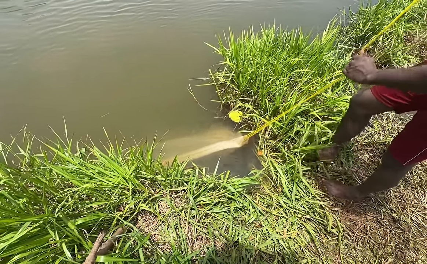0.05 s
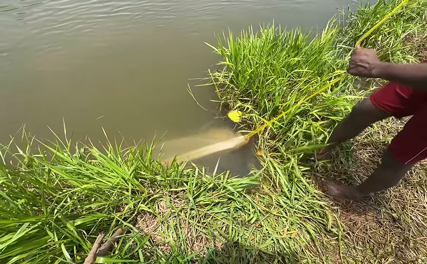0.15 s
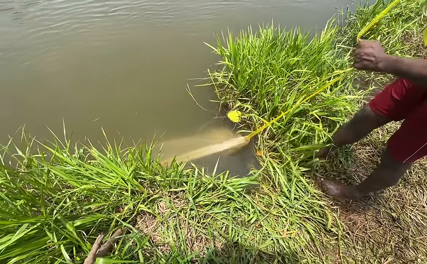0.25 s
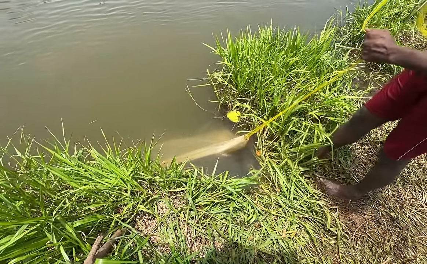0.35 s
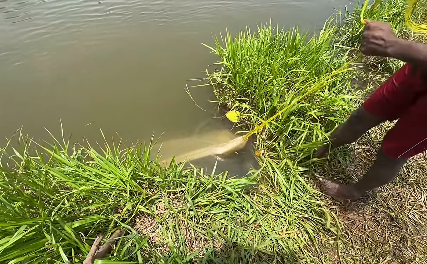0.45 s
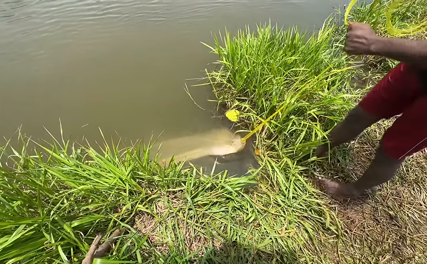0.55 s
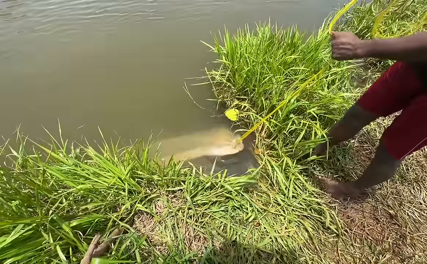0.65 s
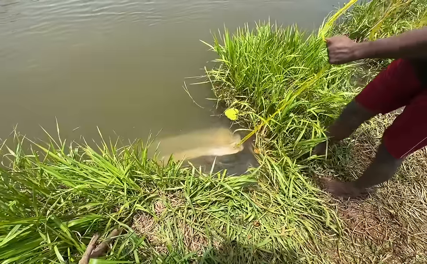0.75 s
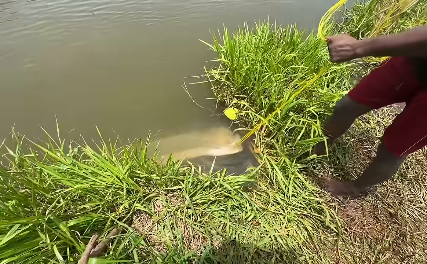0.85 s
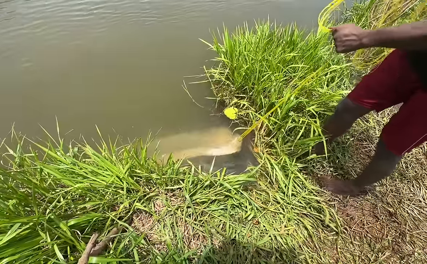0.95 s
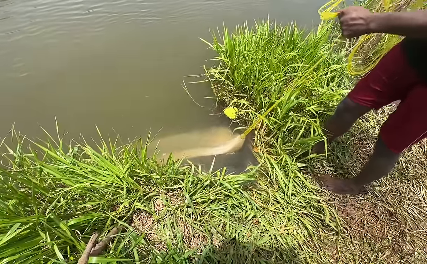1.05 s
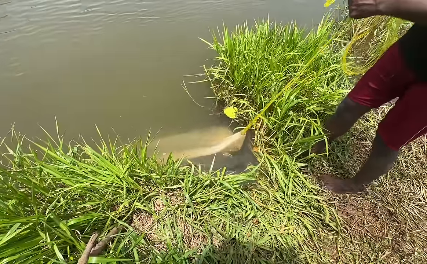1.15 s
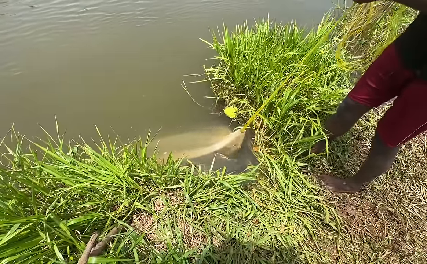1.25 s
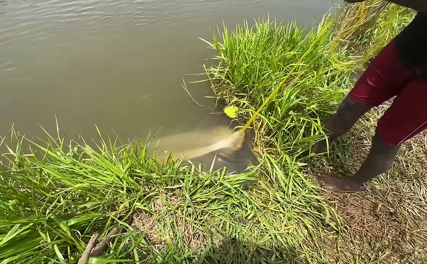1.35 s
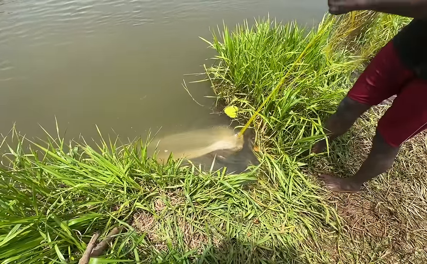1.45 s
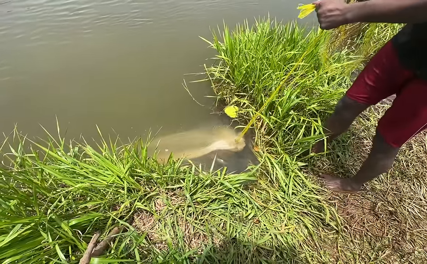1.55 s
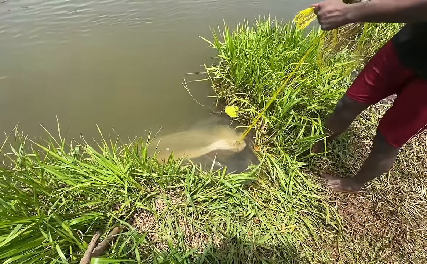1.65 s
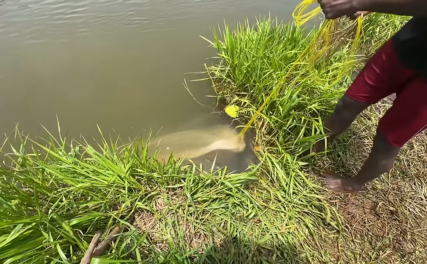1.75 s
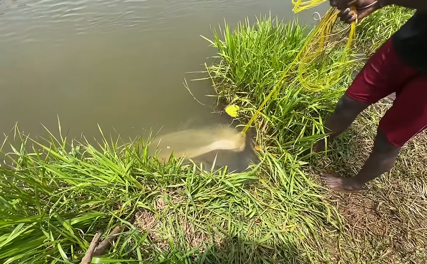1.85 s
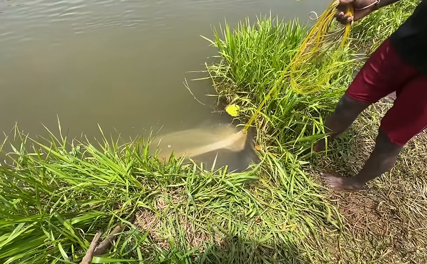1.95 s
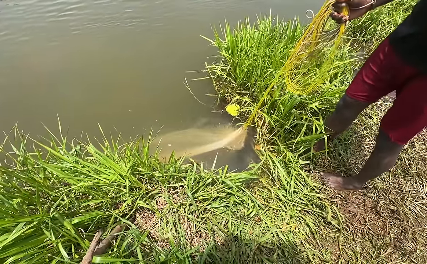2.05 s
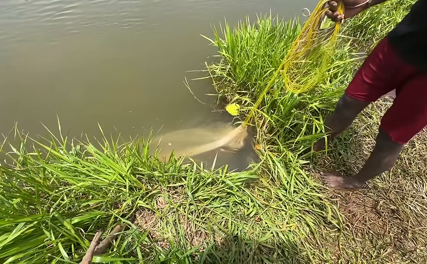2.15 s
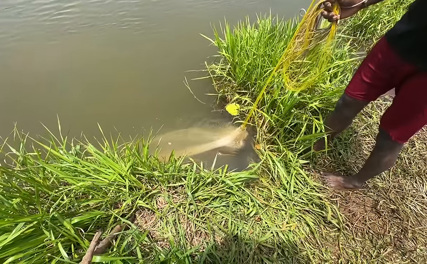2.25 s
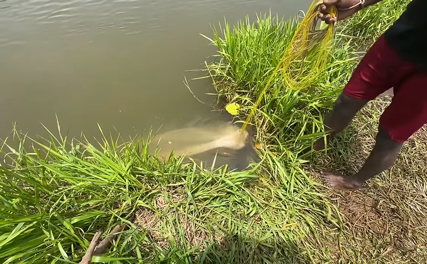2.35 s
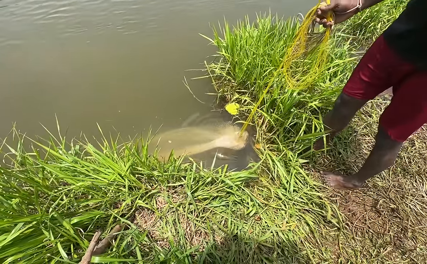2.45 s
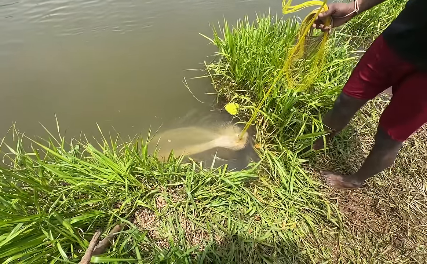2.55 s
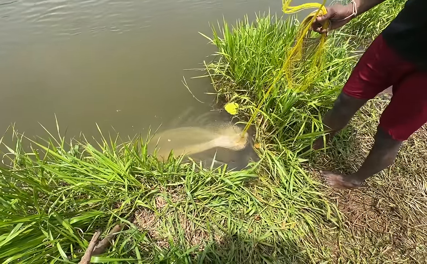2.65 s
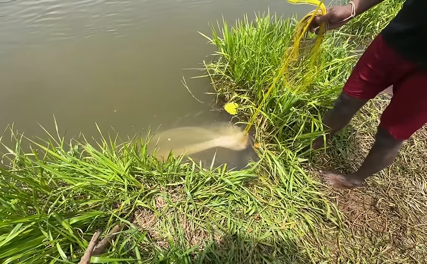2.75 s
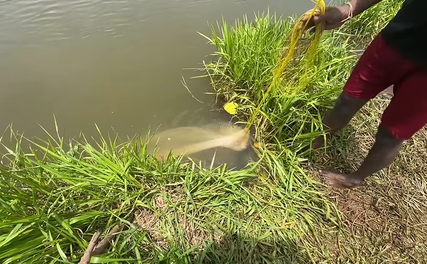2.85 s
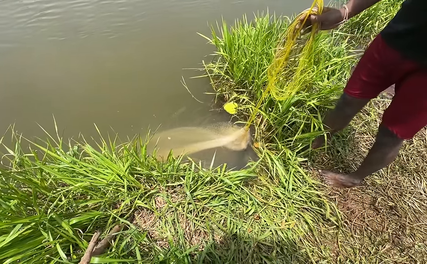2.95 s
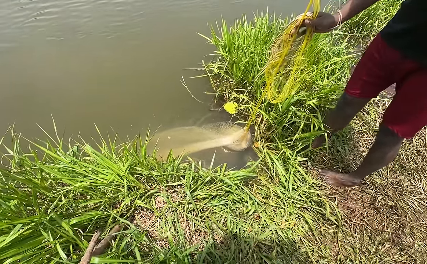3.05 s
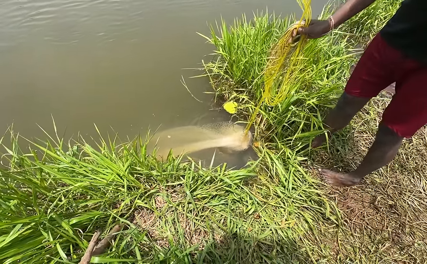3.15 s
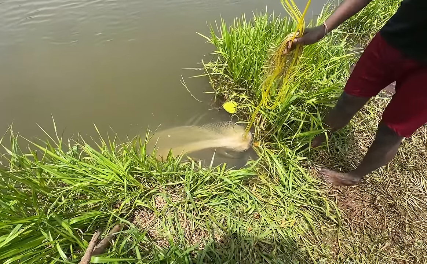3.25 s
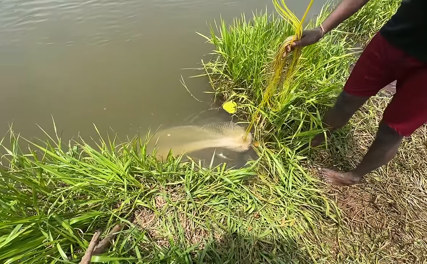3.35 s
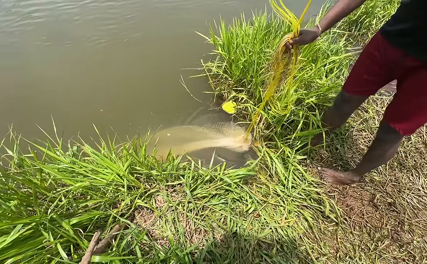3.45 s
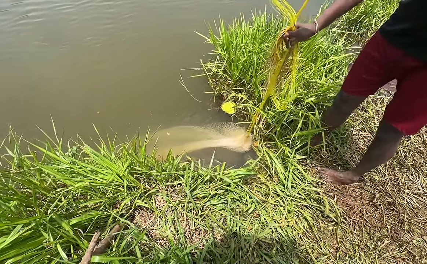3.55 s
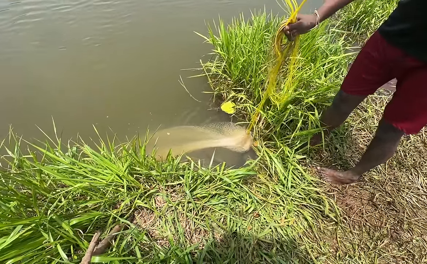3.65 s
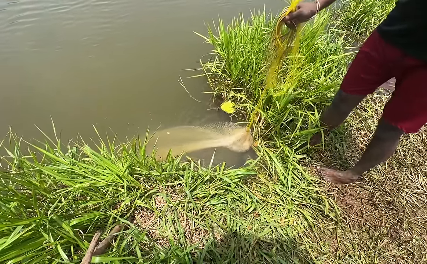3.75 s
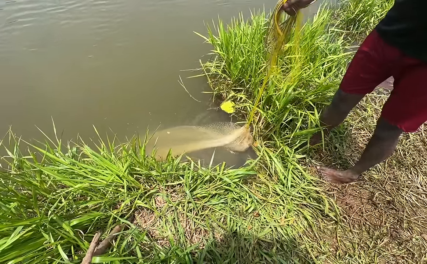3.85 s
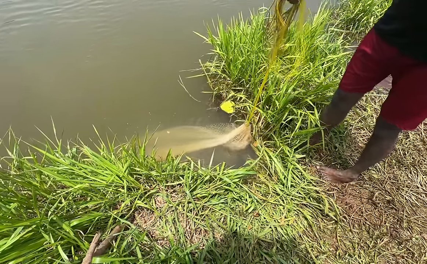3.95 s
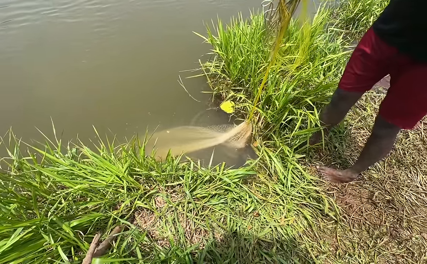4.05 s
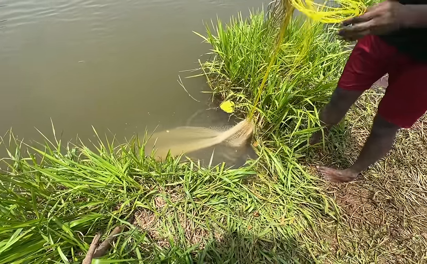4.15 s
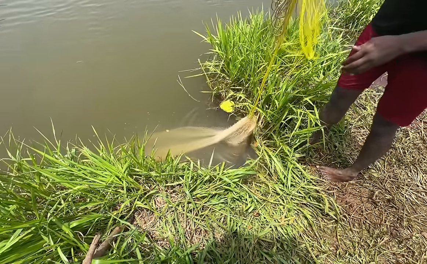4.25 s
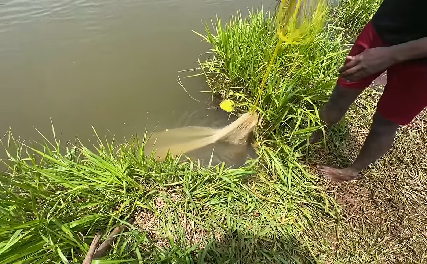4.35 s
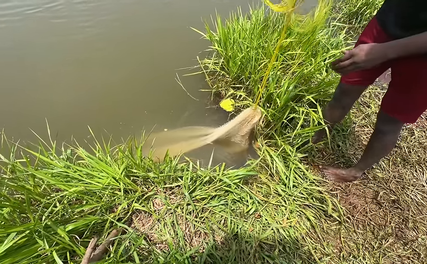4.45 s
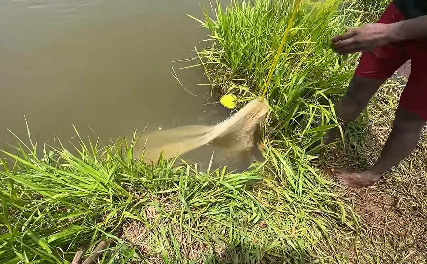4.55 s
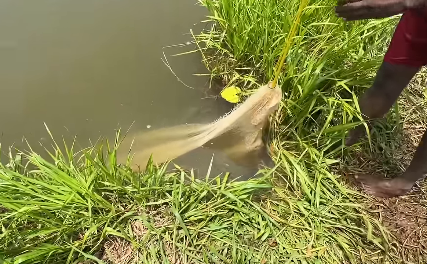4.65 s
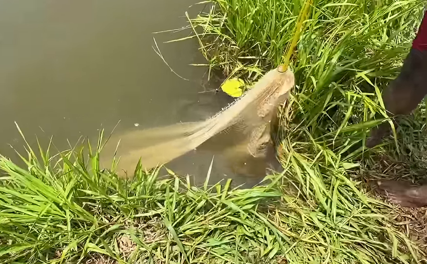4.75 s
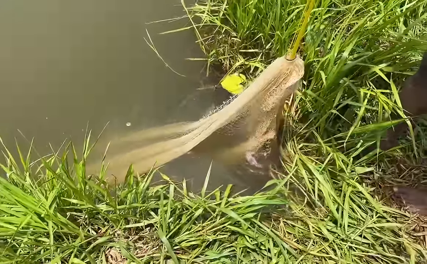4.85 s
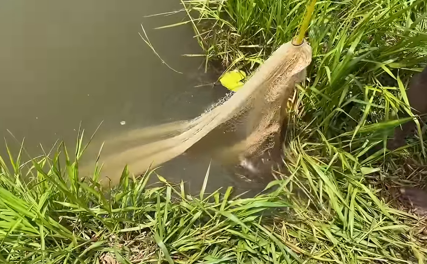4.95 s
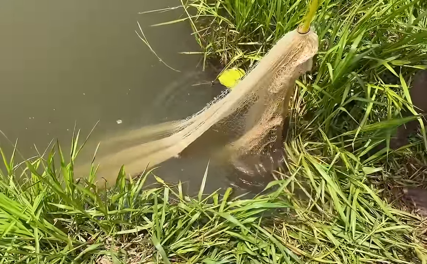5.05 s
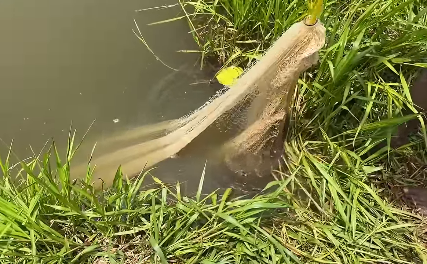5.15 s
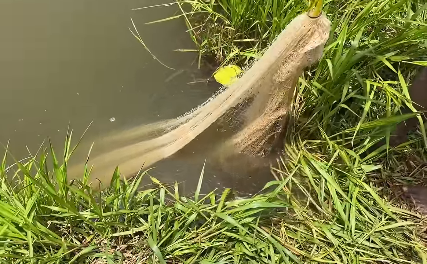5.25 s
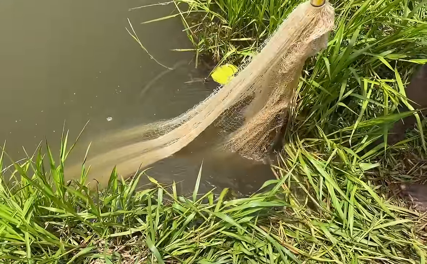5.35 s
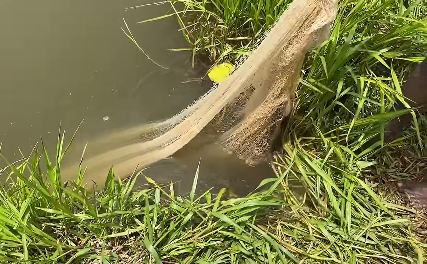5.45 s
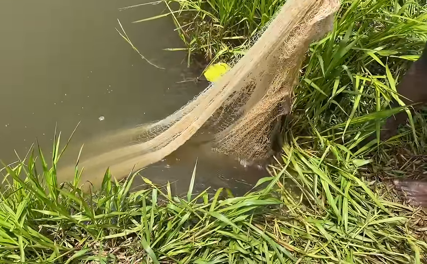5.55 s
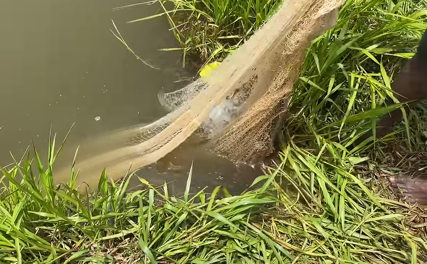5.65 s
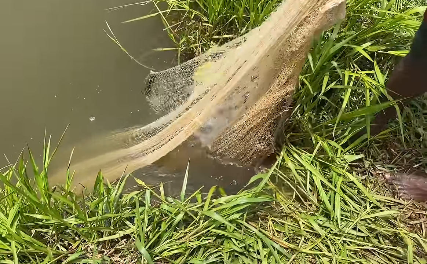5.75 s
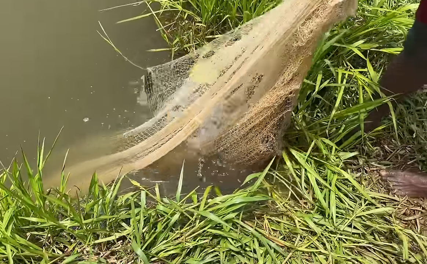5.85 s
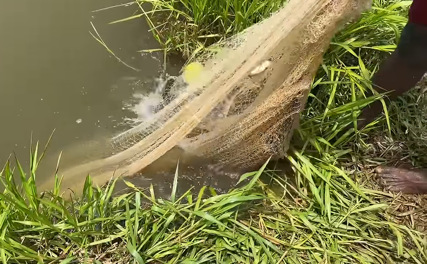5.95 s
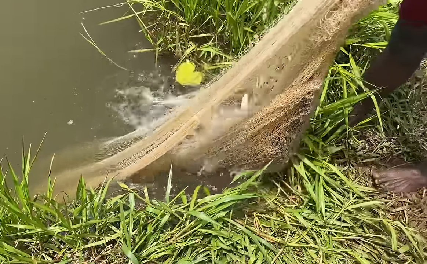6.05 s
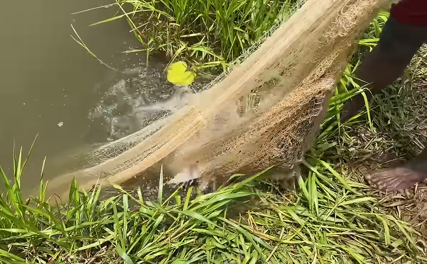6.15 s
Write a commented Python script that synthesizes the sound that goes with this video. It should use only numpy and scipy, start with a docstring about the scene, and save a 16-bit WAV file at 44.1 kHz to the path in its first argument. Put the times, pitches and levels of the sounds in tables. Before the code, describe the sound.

On an open river bank, grass crackles and stems snap as a net is dragged, with a few hollow plops at the waterline. The hauling eases, leaving chirping birds, shrill pulsing insects and low wind bumps on the microphone. At the very end the net surfaces close by with a sudden splash, slaps, bubbling and spray swelling until the cut.

```python
"""A cast net is dragged through the grass of a river bank: noise crackles, stems snap, plops ring at the waterline.
Two insects chirp in wing strokes, wind presses and flutters on the microphone, and birds call in gliding tones.
The haul rests while the rope is coiled, with a few tugs and swishes left among the birds, then picks up again.
At 5.6 s the net breaks the surface and the catch thrashes: slaps of ringing cavities, rushing water and spray,
with drops and a swarm of bubbles."""
import sys
import numpy as np
from scipy import signal
from scipy.fft import rfft, irfft, next_fast_len
from scipy.io import wavfile
from scipy.ndimage import uniform_filter1d

SR = 44100
rng = np.random.default_rng(int(sys.argv[2]) if len(sys.argv) > 2 else 0)


def pcm_store(signal):
    """Save signal as 16-bit PCM."""
    levels = np.round(np.clip(np.atleast_2d(signal), -1, 1) * 32767)
    wavfile.write(sys.argv[1], SR, levels.astype(np.int16).T)


N = 273727
TIME = np.arange(N) / SR
SURFACING_S = 5.6
CUTOFF_HZ = 16000
BIRD_LAG_S = 0.00044   # the left side hears the birds first

# tone of churned water: [pitch_hz, level_db per Hz]
WATER = [(45, -10), (80, 4.5), (140, 2.5), (230, -2.5), (330, -7.5), (520, 0.5), (760, -4.5), (1050, -1.5),
         (1450, 1), (2000, -1.5), (2450, -7), (2900, -25), (3500, -8)]
# left-right likeness of sound in the open: [pitch_hz, likeness -1 to 1]
AIR_LIKENESS = [(60, 0.13), (300, 0.34), (700, -0.04), (1400, -0.26), (4000, -0.1), (15000, 0.061)]


def from_db(db):
    """Decibels to a linear gain."""
    return 10 ** (np.asarray(db) / 20)


def rms_one(x):
    """Scale a sound to rms 1."""
    return x / np.sqrt(np.mean(x ** 2) + 1e-20)


def in_time(rows):
    """The columns of a curve, one value a sample."""
    s, *columns = np.transpose(rows)
    return [np.interp(TIME, s, column) for column in columns]


def at_hz(points, hz):
    """Read a curve at a pitch, straight between points on a log pitch axis."""
    points = np.array(points)
    return np.interp(np.log(hz), np.log(points[:, 0]), points[:, 1])


def add(out, s, sound, pan_db=0, lag=0):
    """Mix a sound in at time s, leaning left by pan_db and reaching the right side lag seconds later."""
    for side, sign in zip(out, (1, -1)):
        i = int(np.clip((s - sign * lag / 2) * SR, 0, N))
        side[i:i + len(sound)] += from_db(sign * pan_db / 2) * sound[:N - i]


def drift(rate):
    """Random wandering of rms 1, smoothed above rate Hz and held for 40 samples a step."""
    r = np.exp(-80 * np.pi * rate / SR)
    chance = rng.standard_normal(N // 40 + 2002)
    slow = signal.lfilter([1], [1, -2 * r, r * r], chance)[2000:]   # skip the filter's settling
    return np.repeat(rms_one(slow), 40)[:N]


def noise(spectrum, likeness, patchy_db, rate):
    """Stereo noise in third-octave bands, each flickering on its own; rms 1."""
    out, edges = 0, 20 * 2 ** (np.arange(30) / 3)
    white = rng.standard_normal((2, 2, N))
    for k, (low, high) in enumerate(zip(edges, edges[1:])):
        if high < spectrum[0][0] or low > spectrum[-1][0]:
            continue
        hz = np.sqrt(low * high)
        band = signal.butter(2, [low, high], "band", fs=SR, output="sos")
        mid, side = signal.sosfilt(band, white[k % 2])   # neighbouring bands use separate noise
        alike = np.clip(at_hz(likeness, hz), -1, 1)
        gain = from_db(at_hz(spectrum, hz) + patchy_db * drift(rate))
        out = out + gain * (np.sqrt(1 + alike) * mid + np.sqrt(1 - alike) * side * [[1], [-1]])
    return rms_one(out)


def burst(t60, attack):
    """A quick straight rise to height 1, then a decay of 60 dB in t60 seconds."""
    t = np.arange(int((t60 + attack) * SR) + 2) / SR
    return np.minimum(t / attack, 1) * from_db(-60 * np.maximum(t - attack, 0) / t60)


def swell(length, rise):
    """A smooth hump of height 1 that peaks after the share rise of its length."""
    along = np.linspace(0, 1, int(length * SR))
    return np.sin(np.pi * np.interp(along, [0, np.clip(rise, .05, .95), 1], [0, .5, 1]))


def hiss(shape, hz, width):
    """Noise around hz under an envelope; width is the ratio of its top to its centre."""
    width = max(width, 1.05)
    band = signal.butter(2, [hz / width, min(hz * width, CUTOFF_HZ)], "band", fs=SR, output="sos")
    return shape * rms_one(signal.sosfilt(band, rng.standard_normal(len(shape))))


def bubble(hz, t60, attack, rise):
    """A pocket of air rings, rising in pitch by the share rise as it nears the surface."""
    shape = burst(t60, attack)
    pitch = hz * (1 + rise * np.linspace(0, 1, len(shape)))
    return shape * np.sin(2 * np.pi * np.cumsum(pitch) / SR)


def open_air():
    """The steady air of the bank: faint noise whose bands flicker."""
    # tone of the air: [pitch_hz, level_db per Hz]
    air_tone = [(59, -22), (100, 5.5), (396, -5.5), (1000, -8), (2110, -7), (2540, -66), (2790, -7),
                (3120, -38), (4780, -51), (6800, -111.5), (8500, 0), (11000, -49.5), (18700, -120)]
    return from_db(-65.5) * noise(air_tone, AIR_LIKENESS, patchy_db=5.0, rate=12.2)


def wind():
    """The breeze makes lumpy pressure on each port; a buffet is a low push of a few cycles with a flutter above it."""
    # tone of the low pressure noise: [pitch_hz, level_db per Hz]
    rumble_tone = [(20, -29), (32, -9.5), (50, -4), (75, -0.5), (100, -10), (135, -15), (200, -25.5),
                   (300, -96)]
    # tone of the flutter: [pitch_hz, level_db per Hz]
    flutter_tone = [(90, -7.5), (170, 7), (270, -10.5), (400, -43), (560, -28)]
    # breeze on the microphone, before the trims of rumble and flutter: [time_s, level_db]
    breeze = [(0.0, -64.5), (0.62, -61), (0.78, -57), (1.62, -49), (1.86, -60), (3.28, -62.5),
              (3.66, -45.5), (3.76, -62.5), (4.21, -57.5), (4.4, -67.5), (4.78, -69.5), (5.08, -51),
              (5.42, -71), (5.61, -59.5), (5.78, -53), (6.2, -85)]
    # buffets of wind: [centre_s, push_db, push_hz, flutter_db, flutter_length_s]
    buffets = [(0.104, -48.5, 142, -51, 0.046), (0.789, -42, 82, -61, 0.12),
               (1.072, -32.5, 76.5, -57, 0.074), (1.321, -35, 75, -55.5, 0.22),
               (2.139, -44.5, 59.3, -82, .06), (2.289, -45.5, 76, -68, 0.054),
               (3.556, -33.5, 77, -41.5, 0.037), (3.614, -34.5, 107, -52, 0.065),
               (3.71, -29.5, 71.5, -53.5, 0.12), (3.783, -38, 72, -55.5, 0.061),
               (3.974, -48, 87.5, -55, 0.12), (4.106, -37, 84, -48.5, 0.28), (4.247, -43, 78, -48.5, 0.093),
               (5.103, -43.5, 96, -53, 0.036), (5.355, -36.5, 67.6, -60, 0.19),
               (5.668, -35.5, 84, -43.5, 0.11), (5.862, -37, 64.5, -62, 0.048)]
    breeze_db, = in_time(breeze)
    pushes, flutter = np.zeros((2, 2, N))
    for s, push_db, hz, flutter_db, length in buffets:
        t = np.arange(0, 4.28 / hz, 1 / SR)   # 4.28 cycles
        push = np.hanning(len(t)) * np.sin(2 * np.pi * (hz * t + rng.random()))
        add(pushes, s - t[-1] / 2, from_db(push_db) * push, pan_db=6.5)
        add(flutter, s - length / 2, from_db(flutter_db) * swell(length, 0.31) ** 2, pan_db=9.5)
    rumble = from_db(breeze_db + 7) * noise(rumble_tone, AIR_LIKENESS, patchy_db=5.0, rate=7.3)
    flutter = np.hypot(flutter, from_db(breeze_db - 22.5))
    return rumble + pushes + flutter * noise(flutter_tone, AIR_LIKENESS, patchy_db=7.0, rate=20.0)


def far_chorus(chorus_db):
    """Far birds along the river blur into a flickering band of noise."""
    # tone of the far birds: [pitch_hz, level_db per Hz]
    chorus_tone = [(1200, -28), (2000, 15.5), (2500, -1), (3200, 9.5), (4100, 4.5), (5400, 12), (6500, -24)]
    return from_db(chorus_db - 0.8) * noise(chorus_tone, AIR_LIKENESS, patchy_db=2.5, rate=5.4)


def note(length, pitches, trill, waver, sweep=0.058, dip=0.78, hoarse=0.031, rise=0.45, soft=0.3):
    """A whistle arching through three pitches; in a trill it turns hoarse and breaks into quick downward flicks."""
    t = np.arange(int(length * SR)) / SR
    along, flick = t / length, t * 50.15 % 1   # flicks per s
    unsteady = waver[rng.integers(N - len(t)):][:len(t)]
    hz = np.polyval(np.polyfit([0, .5, 1], pitches, 2), along)
    hz = hz * (1 + sweep * trill * (1 - 2 * flick) + (0.006 + hoarse * trill) * unsteady)
    gaps = 1 - np.clip(dip * trill, 0, 1) * np.cos(np.pi * flick) ** 2
    shape = np.abs(swell(length, rise)) ** soft * gaps
    return rms_one(shape * np.sin(2 * np.pi * np.cumsum(hz) / SR))


def twitter(chorus_db, count):
    """Far birds chirp at random, their level following the chorus."""
    out, waver = np.zeros((2, N)), drift(200)
    for when, pitch, glide, span, loud, side in rng.random((count, 6)):
        pitches = 2050 * 2.1 ** pitch * (1 + 0.145 * (glide - .4) * np.array([1, 0, -1]))
        level_db = chorus_db[int(when * N)] - 1 + 7 * loud
        chirp = note(0.015 + 0.0449 * span, pitches, trill=0.43, waver=waver)
        add(out, when * N / SR, from_db(level_db) * chirp, pan_db=8 * (side - .5))
    return out


def coos():
    """A far bird's call rises and sinks; only its second to fourth harmonics carry across the water."""
    # calls, with the pitch that the arch scales: [start_s, length_s, pitch_hz, level_db]
    coo_calls = [(1.402, 0.44, 584, -62), (2.22, 0.45, 624, -58), (2.905, .39, 613, -59.5)]
    # pitch arch of a call: [share of the call, share of its pitch]
    coo_arch = [(0, 0.71), (.12, .96), (.28, 1.01), (.55, 0.97), (.78, .885), (1, 0.69)]
    # resonance of the throat: [pitch_hz, level_db]
    throat = [(900, -32), (1100, -3.5), (1250, 2.5), (1520, -5), (1680, -11), (1820, -6.5), (2500, -49)]
    out, waver = np.zeros((2, N)), drift(170)
    for s, length, pitch_hz, level_db in coo_calls:
        along = np.linspace(0, 1, int(length * SR))
        unsteady = 1 + 0.032 * waver[int(s * SR):][:len(along)]
        hz = pitch_hz * np.interp(along, *np.transpose(coo_arch)) * unsteady
        phase = 2 * np.pi * np.cumsum(hz) / SR
        call = sum(from_db(at_hz(throat, k * hz)) * np.sin(k * phase) for k in range(2, 5))
        call = rms_one(np.abs(np.sin(np.pi * along)) ** 0.32 * call)
        add(out, s, from_db(level_db) * call, pan_db=1.0, lag=0.00028)
    return out


def songbirds():
    """Small birds in the trees glide from pitch to pitch; one wheezes above them."""
    # gliding chirps: [start_s, length_s, first_hz, last_hz, level_db, trill 0-1, left_over_right_db]
    chirps = [(0.36, 0.13, 3450, 3300, -64, 0.6, -8), (0.351, 0.1, 1960, 2320, -66, 1, -4),
              (0.425, 0.047, 2340, 2316, -60, 0.8, -2), (0.464, 0.096, 3024, 2440, -60.5, 0.9, -2),
              (0.563, 0.023, 3350, 3454, -58.5, 0.2, -11.5), (0.598, 0.013, 2340, 1870, -55.5, 0.7, -3),
              (1.155, 0.12, 3950, 4020, -64, 0.13, -1), (1.162, 0.13, 3240, 3300, -61.5, 1, -5),
              (1.336, 0.043, 3040, 2540, -64, 1, -6), (1.44, 0.065, 3830, 4040, -61.5, 0.75, -3),
              (1.405, 0.035, 3220, 3285, -53.5, 0.46, -5.5), (1.761, 0.17, 3094, 3430, -66.5, 0.82, -6),
              (2.186, 0.031, 2960, 2980, -66, 0, -7.5), (2.225, 0.11, 4030, 4050, -63, 0.1, -1),
              (2.36, 0.019, 2660, 3440, -59, 0, -6), (2.46, 0.033, 3410, 2790, -59.5, 1, -4),
              (2.815, 0.065, 4100, 3890, -61, 0.4, 0), (2.835, 0.023, 3060, 3100, -62.5, 0.4, -14),
              (2.881, 0.048, 3620, 3450, -62, 0.04, -12), (3.049, 0.015, 2220, 1640, -65, 0.2, -8),
              (3.075, 0.022, 3170, 3120, -58, 0.82, -7), (3.194, 0.045, 3950, 3750, -66, 0.4, -4),
              (3.376, 0.051, 3330, 3840, -56, 0.47, -5.5), (3.384, 0.16, 3025, 3130, -60, 0.54, -8.5),
              (3.476, 0.053, 4350, 3980, -59.5, 0.13, -3), (3.642, 0.01, 3220, 3560, -62, 0.4, -16),
              (3.682, 0.026, 4170, 4250, -62.5, 0.03, -4), (3.693, 0.025, 4020, 3250, -59, 0.15, -6),
              (3.773, 0.033, 4310, 3940, -58, 0.72, 0), (3.797, 0.034, 3600, 3640, -56.5, 0.95, -8),
              (3.849, 0.04, 3450, 3130, -50, 0.5, -8), (3.862, 0.015, 4200, 3840, -57, 0.1, -2),
              (3.88, 0.033, 3380, 2865, -54.5, 0.13, 2), (3.916, 0.047, 2810, 2570, -56, 0.25, -4),
              (3.984, 0.014, 2640, 2480, -58.5, 0.35, -6), (3.94, 0.026, 3320, 3450, -62, 0.2, -5),
              (4.012, 0.016, 3740, 3090, -58.5, 0.5, -10), (4.093, 0.021, 4200, 4320, -55.5, 0.02, 0),
              (4.114, 0.019, 4200, 4010, -50.5, 0.34, -2), (4.14, 0.019, 3620, 4000, -55.5, 0.3, 1),
              (4.299, 0.04, 4110, 3980, -51.5, 0.28, 1), (4.325, 0.08, 3750, 3920, -52, 0.2, 0),
              (4.395, 0.033, 3900, 4065, -54.5, 0.16, 4), (4.535, 0.03, 3400, 3060, -61, 0.3, -1),
              (5.04, 0.044, 3940, 3670, -59.5, 0.2, -6), (5.314, 0.041, 2780, 2430, -65, 0.2, -5)]
    # thin hoarse calls, with the pitch that the arch scales: [start_s, length_s, pitch_hz, level_db]
    wheezes = [(1.441, 0.064, 4900, -66), (1.703, 0.22, 4940, -70.5), (1.834, 0.085, 5030, -72),
               (2.095, 0.18, 4830, -72.5), (2.453, 0.44, 4960, -68), (2.664, 0.19, 4800, -65)]
    # share of a wheeze's pitch at its start, middle and end
    wheeze_arch = np.array([0.98, 0.96, .93])
    out, waver = np.zeros((2, N)), drift(146.3)
    for s, length, first_hz, last_hz, level_db, trill, pan_db in chirps:
        call = note(length, np.geomspace(first_hz, last_hz, num=3), trill, waver)
        add(out, s, from_db(level_db) * call, pan_db, BIRD_LAG_S)
    for s, length, hz, level_db in wheezes:
        call = note(length, hz * wheeze_arch, 1, waver, sweep=0.019, dip=0.52, hoarse=0.0292)
        add(out, s, from_db(level_db) * call, pan_db=4.5, lag=BIRD_LAG_S)
    return out


def trills():
    """The nearest bird repeats one arching, rolled call."""
    # calls, with the pitch that the arch scales:
    # [start_s, length_s, pitch_hz, level_db, trill 0-1, left_over_right_db]
    rolled_calls = [(0.956, 0.18, 2522, -52, 0.65, -3), (2.771, 0.23, 2600, -59, 0.91, -3),
                    (4.823, 0.17, 2594, -59, 0.66, -7)]
    # share of the pitch at the start, middle and end
    trill_arch = np.array([.92, 0.98, 0.91])
    out, waver = np.zeros((2, N)), drift(150)
    for s, length, hz, level_db, trill, pan_db in rolled_calls:
        call = note(length, hz * trill_arch, trill, waver, sweep=0.034, dip=1.0, hoarse=0.027, rise=0.21, soft=0.72)
        add(out, s, from_db(level_db) * call, pan_db, BIRD_LAG_S)
    return out


def insect(levels, tempo, hz, pulse_hz, duty, edge, sweep, pan_db, lag):
    """Chirps fill the share duty of each cycle of a changing tempo; each is a run of wing strokes that fall in pitch."""
    (level_db,), (chirps_per_s,) = in_time(levels), in_time(tempo)
    chirp = np.cumsum(chirps_per_s) / SR % 1
    gate = np.clip((duty / 2 - np.abs(chirp - .5)) / edge + .5, 0, 1)
    stroke = (TIME * pulse_hz + 0.48 * drift(24)) % 1
    shape = gate * (0.074 + 0.27 * np.sin(np.pi * stroke) ** 2)
    pitch = hz * (1 - sweep * (2 * stroke - .5) ** 2 + 0.006 * drift(586))
    out = np.zeros((2, N))
    add(out, 0, from_db(level_db) * shape * np.sin(2 * np.pi * np.cumsum(pitch) / SR), pan_db, lag)
    return out


def two_insects():
    """A near and a far insect, each a high tone pulsed by its wing strokes."""
    # chirp levels, before the stroke's shape: [time_s, level_db]
    near_levels = [(.3, -49.5), (1.0, -45), (1.8, -44), (2.5, -45), (3.2, -53), (4.2, -48.5), (5.6, -51)]
    far_levels = [(.3, -49), (1.1, -42), (3.6, -43), (5.2, -45), (5.7, -49)]
    # chirping speed: [time_s, chirps per s]
    near_tempo = [(0, 9.11), (.6, 12.42), (1, 11.33), (1.6, 11.12), (2.2, 10.61), (2.7, 12.2), (3.1, 10.78),
                  (3.5, 11.47), (5, 11.56), (5.6, 12.63)]
    far_tempo = [(0, 10.28), (.5, 9.67), (1, 10.69), (1.5, 11.24), (2.1, 11.11), (2.7, 11.98), (3.1, 11.68),
                 (3.5, 10.58), (3.9, 10.39), (4.4, 10.78), (5, 9.4), (5.6, 11.76)]
    near = insect(near_levels, near_tempo, hz=9735, pulse_hz=94.0, duty=0.42, edge=0.3, sweep=0.037,
                  pan_db=-8.5, lag=-.00002)
    far = insect(far_levels, far_tempo, hz=10630, pulse_hz=99, duty=0.25, edge=0.079, sweep=0.054,
                 pan_db=1.0, lag=-0.00028)
    return near + far


def bank_echoes(x, t60, count):
    """Scattered returns from trees and the far bank, different on each side, weaken with their delay."""
    out = np.zeros((2, N))
    for side, source in zip(out, x):
        for delay in rng.uniform(0.0082, .2, count):
            lag = int(delay * SR)
            side[lag:] += from_db(-60 * delay / t60) * source[:N - lag]
    return out / np.sqrt(count)


def hauling():
    """Grass crackles with the drag and with each tug, feet swish, a few stems snap, the net plops at the waterline."""
    # drag of rope and net through the grass; it rests while the rope is coiled: [time_s, level_db]
    haul = [(0.0, -49.5), (0.13, -45), (0.29, -49), (0.4, -60), (0.9, -67.5), (1.3, -98), (4.0, -124),
            (4.55, -71.5), (5.55, -61)]
    # tone of the grass: [pitch_hz, level_db per Hz]
    grass = [(150, 2), (250, 2.5), (686, -7), (906, -3.5), (1010, -6), (2160, -3), (4050, -0.5),
             (9830, -1.5), (11100, -11.5), (14200, -5.5), (16000, -4)]
    # short tugs on the rope that stir the grass: [start_s, length_s, level_db]
    tug_rows = [(0.688, 0.015, -54), (0.909, 0.22, -56), (1.422, 0.15, -63), (1.855, 0.42, -64.5),
                (2.8, 0.26, -68), (3.418, 0.2, -68), (3.507, 0.1, -65.5), (4.866, 0.25, -65),
                (5.148, 0.2, -59.5)]
    # stems snapping: [start_s, level_db, pitch_hz, t60_s]
    snaps = [(0.028, -40, 7900, 0.028), (0.079, -40.5, 7500, 0.023), (0.121, -44, 7000, .03),
             (0.156, -42, 7560, 0.037), (.286, -50.5, 7000, 0.035), (.317, -51, 3400, 0.013),
             (0.5140, -42, 5060, 0.0035), (0.991, -51.5, 7400, 0.068), (2.852, -52, 10000, .012),
             (3.502, -40.5, 13400, 0.029), (3.612, -55.5, 8500, 0.016), (4.914, -49.5, 9500, 0.044),
             (5.255, -51, 7000, 0.03)]
    # plops of the net at the waterline: [start_s, level_db, pitch_hz at the start, t60_s of the ring]
    plops = [(.126, -48, 890, 0.028), (.193, -42.5, 1220, 0.0079), (0.2441, -42.5, 982, 0.089),
             (0.2444, -34.5, 1486, 0.027), (.625, -45, 577, 0.021)]
    # soft swishes of feet and rope in the grass: [start_s, length_s, pitch_hz, level_db]
    swishes = [(0.049, 0.57, 630, -64.5), (0.348, 0.6, 624, -66), (0.885, 0.14, 1270, -64),
               (3.967, 0.54, 720, -68), (4.032, 0.15, 278, -56)]
    drag_db, = in_time(haul)
    tugs = np.zeros((2, N))
    for s, length, level_db in tug_rows:
        add(tugs, s, from_db(level_db) * swell(length, rise=0.084) ** 2)
    crackle = rms_one(from_db(1.9 * drift(580) + 2.0 * drift(8)))
    rustle = noise(grass, AIR_LIKENESS, patchy_db=1.0, rate=48)
    out = np.hypot(from_db(drag_db), tugs) * crackle * rustle
    for s, level_db, hz, t60 in snaps:
        add(out, s, from_db(level_db) * hiss(burst(t60, 0.00045), hz, width=1.77), pan_db=1.4 * rng.normal())
    for s, level_db, hz, t60 in plops:
        add(out, s, from_db(level_db) * bubble(hz, t60, 0.0022, rise=0.036), lag=0.00023)
        wash = hiss(burst(2.0 * t60, 0.00071), hz, width=1.66)
        add(out, s, from_db(level_db - 2.0) * wash, pan_db=-5.0, lag=0.00019)
    for s, length, hz, level_db in swishes:
        add(out, s, from_db(level_db) * hiss(np.hanning(int(length * SR)), hz, width=1.33))
    return out


def swarm(count, cycles, size_db, spread_db):
    """Bubbles of all sizes born at random around the net; level evened to about rms 1."""
    out = np.zeros((2, N))
    chances, sizes = rng.random((count, 2)), rng.standard_normal((count, 3))
    for (when, pitch), (size, pan, place) in zip(chances, sizes):
        s, hz = SURFACING_S + when * (N / SR - SURFACING_S), 230 * 12 ** pitch
        # high rings are short and spread thin, so height grows with pitch for equal energy per Hz
        gain = hz * from_db(at_hz(WATER, hz) + size_db * min(size, 2))
        ring = bubble(hz, cycles / hz, 0.000087, rise=0.051)
        add(out, s, gain * ring, spread_db * pan, 0.000087 * place)
    power = uniform_filter1d(np.mean(out ** 2, axis=0), SR // 25)
    return out / np.sqrt(np.abs(power) + 1)


def drops(level_db, count):
    """Drops shaken from the mesh patter back on the river, each a tick of a few cycles."""
    out = np.zeros((2, N))
    for when, pitch, size, side in rng.random((count, 4)):
        s, hz = SURFACING_S + when * (N / SR - SURFACING_S), 1300 * 7 ** pitch
        tick = bubble(hz, 14 / hz, .0001, rise=.1)
        gain = from_db(level_db[int(s * SR)] + 4.3 * size)
        add(out, s, gain * tick, 8 * (side - .5), 0.0008 * (side - .5))
    return out


def off_the_bank(x):
    """The bank just behind the net returns a sound a moment later and hollows it."""
    delay_s, share = 0.002104, 0.13
    returned = np.array([np.interp(TIME - delay_s, TIME, side) for side in x])
    return (x + share * returned) / np.hypot(1, share)


def in_the_hollow(x):
    """The hollow between net, water and bank lifts some pitches and swallows others."""
    # peaks and dips: [pitch_hz, width_hz, gain_db]
    resonances = [(764, 36, 8.5), (1752, 146, -15.5), (1890, 95, 10.5), (2025, 66, -9), (2580, 140, 9),
                  (2663, 60, -16)]
    for hz, width_hz, gain_db in resonances:
        b, a = signal.iirpeak(hz, hz / width_hz, fs=SR)
        lifted = a + (from_db(abs(gain_db)) - 1) * b
        x = signal.lfilter(lifted, a, x) if gain_db > 0 else signal.lfilter(a, lifted, x)
    return x


def at_the_ports(x):
    """Sound from the water bends round the recorder, so each pitch meets the two ports with its own level and lead."""
    # reach of the splash at the ports: [pitch_hz, left_over_right_db, left_lead_radians]
    ports = np.array([(151, -.7, -0.27), (380, -2.5, 0.4), (750, 2.5, 0.67), (1360, 6, 1.55),
                      (1840, -2, 1.1), (3800, -2, 1.25), (6600, 5, 1.4), (9700, 0, -2.03),
                      (14200, 0, -1.65)])
    size = next_fast_len(N + SR // 10)
    hz = np.arange(size // 2 + 1) * SR / size + 1   # 1 Hz up, to avoid log of 0
    pan_db, lead = at_hz(ports[:, :2], hz), at_hz(ports[:, ::2], hz)
    half = np.array([[.5], [-.5]])
    return irfft(rfft(x, size) * from_db(half * pan_db) * np.exp(1j * half * lead), size)[:, :N]


def splash():
    """Each slap opens a ringing cavity and throws water and spray; between slaps the water seethes."""
    # water churned by the net, before the trims of its layers: [time_s, bubbling_db, spray_db]
    churn = [(5.61, -33, -37), (5.65, -36.5, -32.5), (5.71, -38.5, -47.5), (5.84, -43.5, -42.5),
             (5.89, -37, -39.5), (5.965, -33.5, -39.5), (6.02, -27.5, -33), (6.11, -27.5, -25),
             (6.14, -33.5, -36)]
    # slaps on the water: [start_s, cavity_db, cavity_hz at the start, gush_db, spray_db, t60_s]
    slaps = [(5.600, -33, 1850, -36.5, -44, 0.058), (5.621, -27.5, 1890, -47, -24, 0.023),
             (5.628, -34, 2140, -44.5, -49, 0.15), (5.627, -32, 1326, -60, -54, 0.067),
             (5.651, -28.5, 1880, -28.5, -45, 0.051), (5.675, -30, 2460, -35.5, -60, 0.042),
             (5.711, -38, 780, -46, -51, 0.06), (5.714, -37.5, 1950, -58, -58, 0.11),
             (5.736, -43, 615, -52, -45.5, 0.19), (5.782, -40, 252, -47, -60, 0.036),
             (5.791, -37, 1880, -34, -42, 0.068), (5.813, -33, 2370, -37.5, -33, 0.055),
             (5.834, -37.5, 776, -38, -44, 0.12), (5.851, -36.5, 1925, -43, -61, 0.082),
             (5.877, -39, 3740, -38, -37, 0.06), (5.881, -37, 830, -31.5, -50, 0.042),
             (5.897, -24.5, 857, -31, -34, 0.057), (5.901, -31.5, 2490, -48, -52, 0.021),
             (5.907, -30, 1390, -46, -55, 0.015), (5.912, -31.5, 470, -55, -50, 0.044),
             (5.95, -27.5, 397, -35.5, -47, 0.033), (5.984, -31, 917, -32.5, -31.5, 0.065),
             (6.008, -24.5, 757, -47, -41, 0.063), (6.020, -23, 590, -30, -24.5, 0.059),
             (6.036, -31, 890, -33, -42, 0.03), (6.056, -27.5, 1378, -31, -44, 0.079),
             (6.068, -23, 410, -46, -40, 0.098), (6.084, -24.5, 262, -51, -30, 0.032),
             (6.105, -16.5, 735, -24, -30, 0.042), (6.109, -18.5, 332, -34, -36, 0.044),
             (6.136, -38, 960, -37, -40, 0.078), (6.177, -31, 687, -39, -53, 0.11)]
    # tone of the spray: [pitch_hz, level_db per Hz]
    spray_tone = [(2200, 9.5), (2800, 6.5), (3700, 6), (5700, 4), (7500, -1), (9300, 6.5), (11000, -21),
                  (13000, -10), (16000, 12)]
    # left-right likeness of the water: [pitch_hz, likeness -1 to 1]
    water_likeness = [(300, 1), (800, 1), (1350, 0.95), (2300, 0.56), (4000, 0.33), (7000, 0.27), (9000, 1)]
    churn_db, mist_db = in_time(churn)
    surfaced = np.clip((TIME - SURFACING_S) / 0.00063, 0, 1)
    cavities, gush, spray = np.zeros((3, 2, N))
    for s, cavity_db, hz, gush_db, spray_db, t60 in slaps:
        add(cavities, s, from_db(cavity_db) * bubble(hz, t60, 0.0011, rise=0.03))
        add(gush, s, from_db(gush_db) * burst(t60, 0.0056))
        add(spray, s, from_db(spray_db) * burst(t60, 0.0015))
    # slaps and seething add as powers
    gush = np.hypot(gush, surfaced * from_db(churn_db - 8.5))
    gush = gush * noise(WATER, water_likeness, patchy_db=2.5, rate=92)
    droplets = rms_one(from_db(2.0 * drift(500)))
    spray = np.hypot(spray, surfaced * from_db(mist_db - 4.0)) * droplets
    spray = spray * noise(spray_tone, water_likeness, patchy_db=2.5, rate=47)
    bubbles = swarm(count=320, cycles=21.0, size_db=5.0, spread_db=3.0)
    bubbles = surfaced * from_db(churn_db - 6.5) * bubbles
    thrown = gush + bubbles + spray + drops(mist_db - 14.0, count=100)
    return at_the_ports(cavities + in_the_hollow(off_the_bank(thrown)))


def scene():
    """Net, wind and wildlife on the open bank."""
    # far birds along the river, before the trims of noise and twitter: [time_s, level_db]
    chorus_levels = [(0.0, -68), (0.89, -63.5), (1.14, -60.5), (1.61, -66.5), (2.13, -73.5), (2.81, -65.5),
                     (3.07, -70), (3.77, -63), (3.96, -61), (4.58, -65), (5.55, -64)]
    chorus_db, = in_time(chorus_levels)
    background = open_air() + wind() + far_chorus(chorus_db)
    over_water, in_open, insects = coos(), trills(), two_insects()
    in_trees = songbirds() + from_db(-11.5) * twitter(chorus_db, count=400)
    sends = from_db(1) * over_water + from_db(7.0) * in_trees + from_db(6) * in_open + from_db(0.5) * insects
    echoes = bank_echoes(sends, t60=0.29, count=100)
    wildlife = over_water + in_trees + in_open + insects + echoes
    return background + wildlife + hauling() + splash()


def record(dry):
    """The microphone port has a deep notch in the treble; the top is cut."""
    notch = signal.butter(3, [10750, 12300], "bandstop", fs=SR, output="sos")
    top = signal.ellip(10, .2, 80, CUTOFF_HZ, fs=SR, output="sos")
    return signal.sosfilt(top, signal.sosfilt(notch, dry))


dry = scene()
out = record(dry)
pcm_store(out)
```